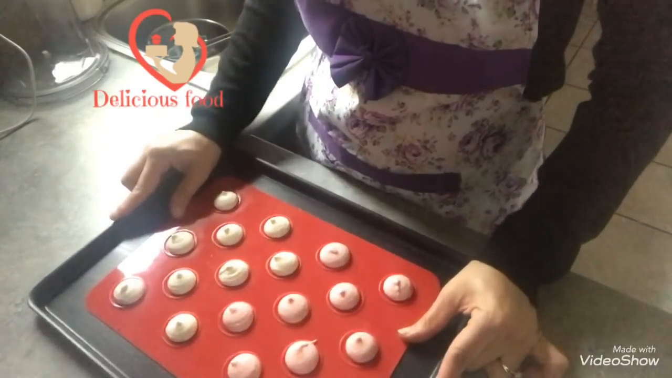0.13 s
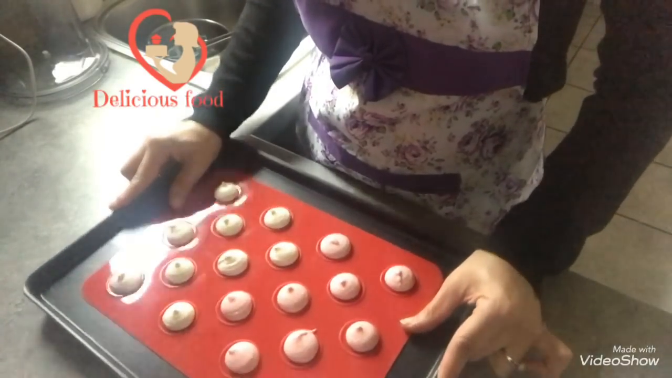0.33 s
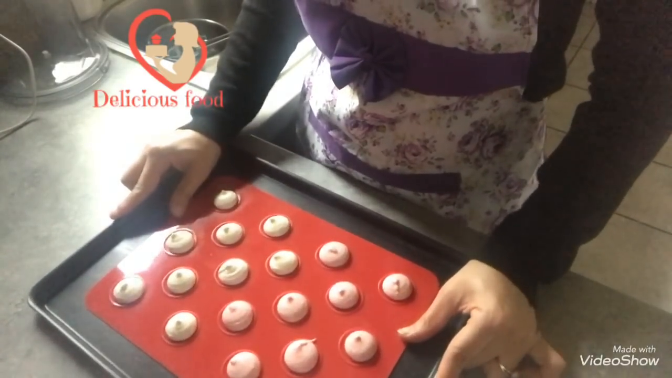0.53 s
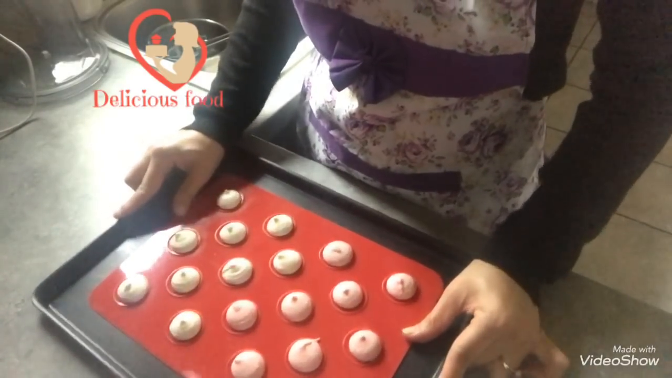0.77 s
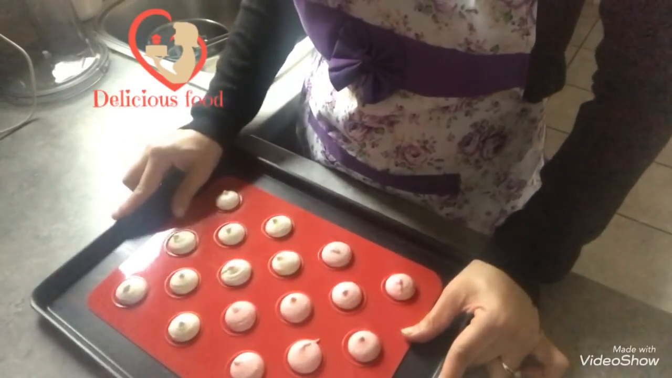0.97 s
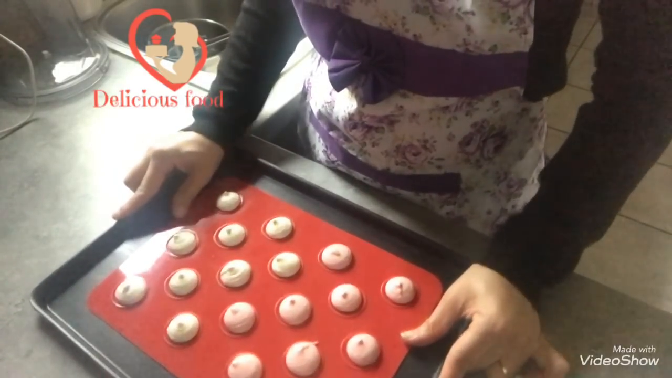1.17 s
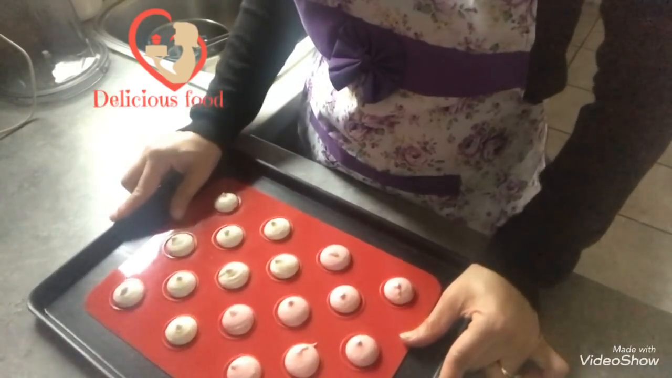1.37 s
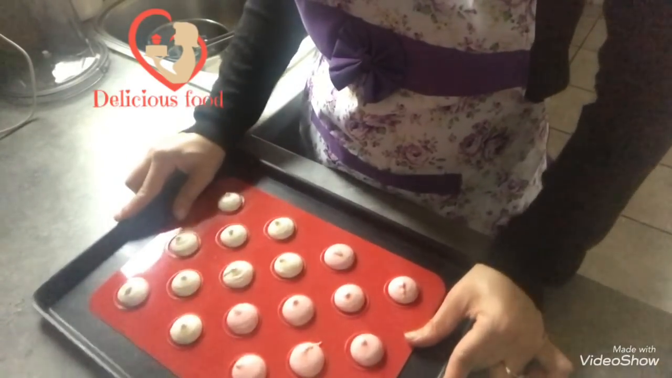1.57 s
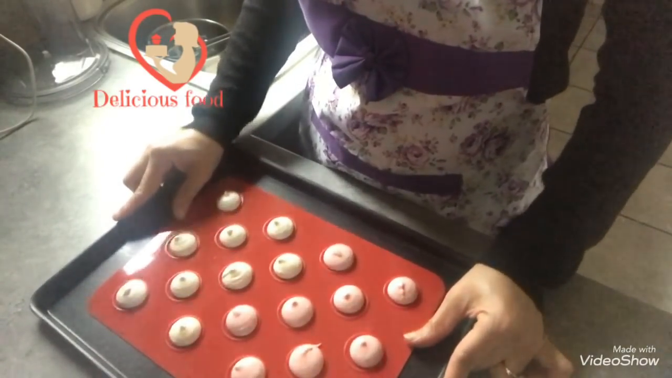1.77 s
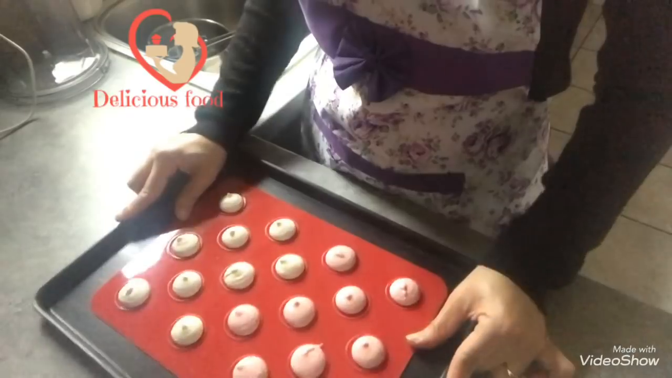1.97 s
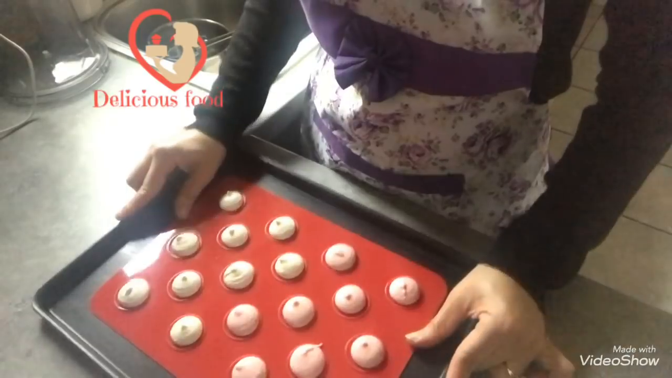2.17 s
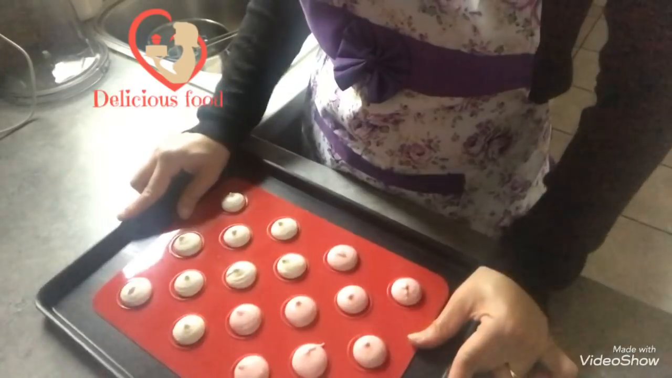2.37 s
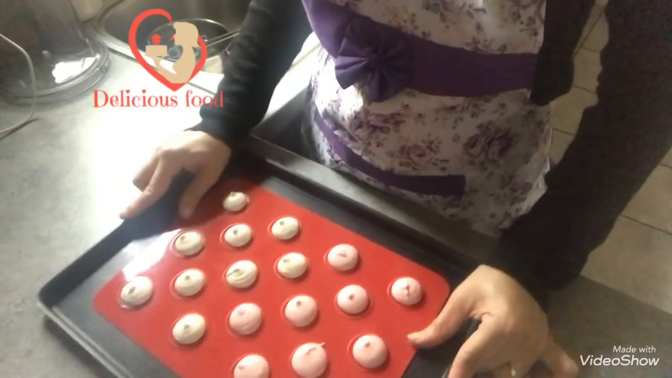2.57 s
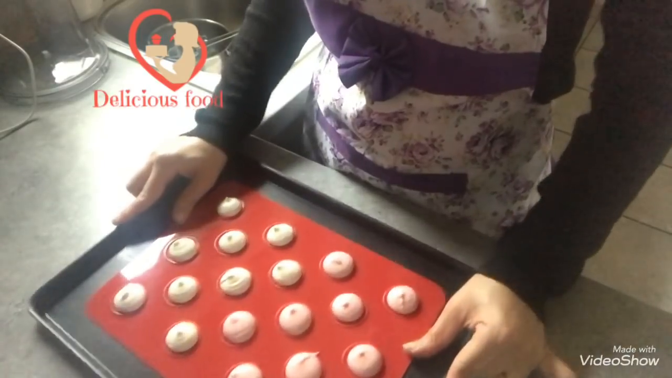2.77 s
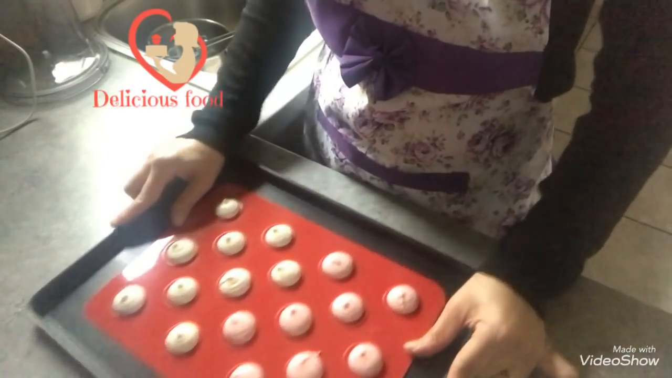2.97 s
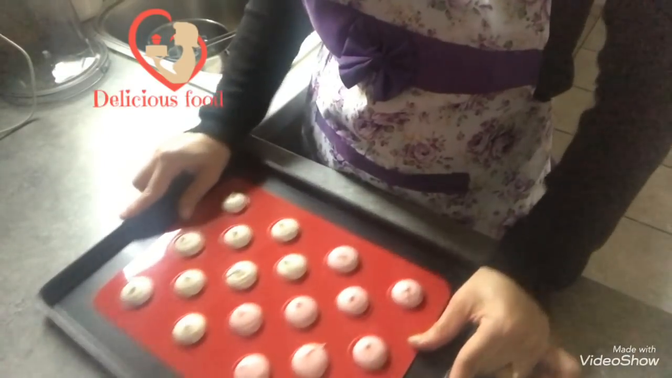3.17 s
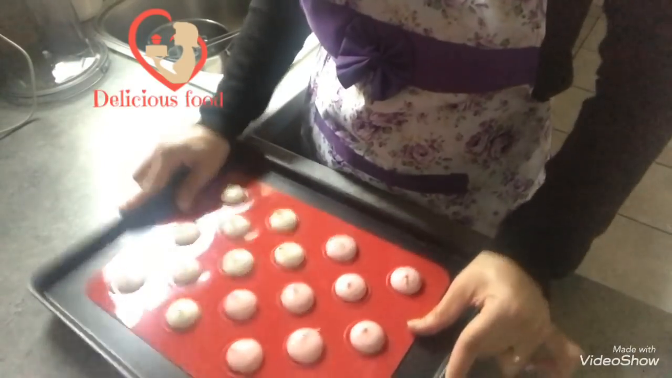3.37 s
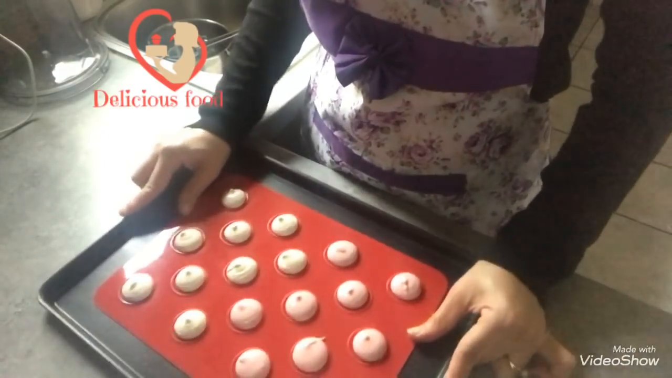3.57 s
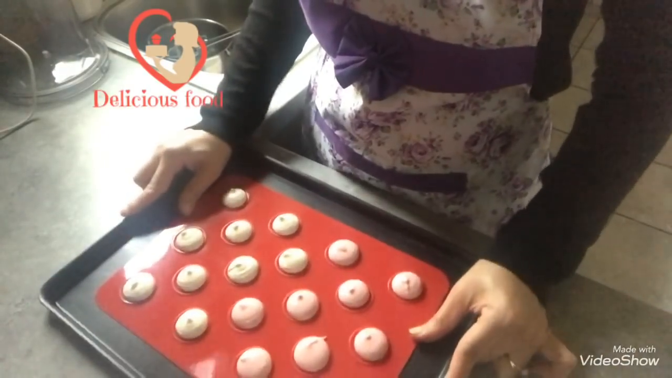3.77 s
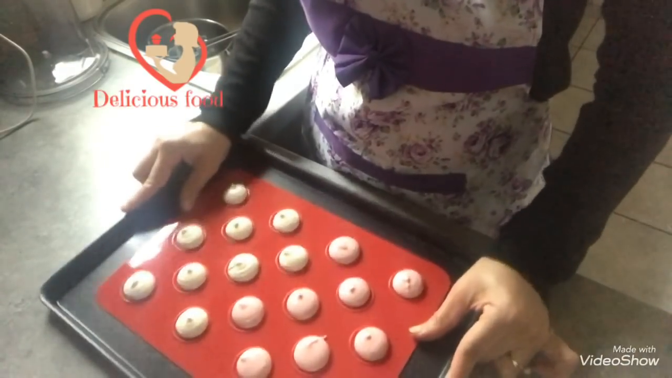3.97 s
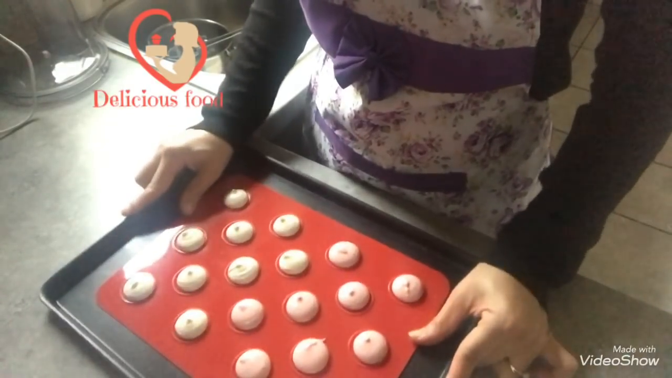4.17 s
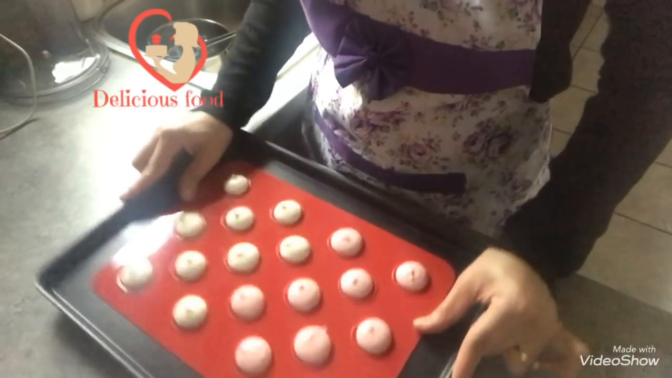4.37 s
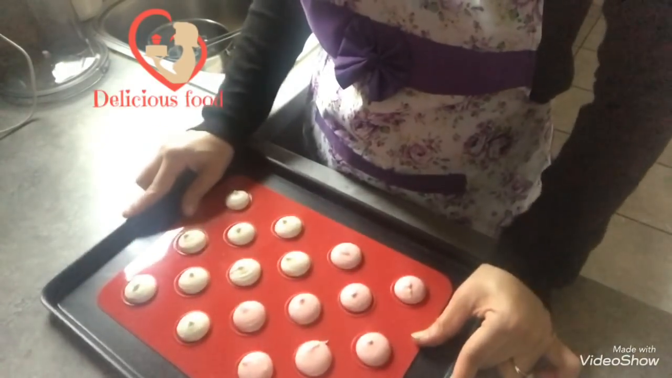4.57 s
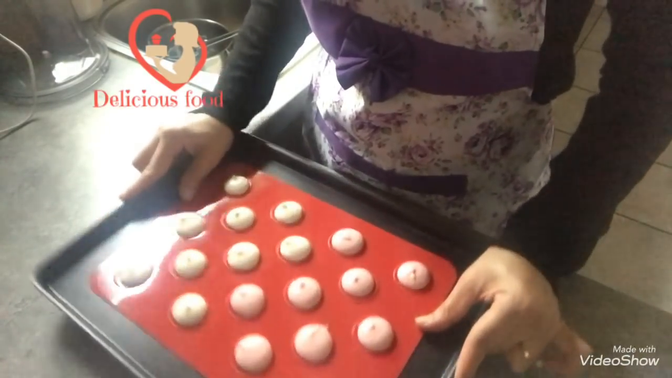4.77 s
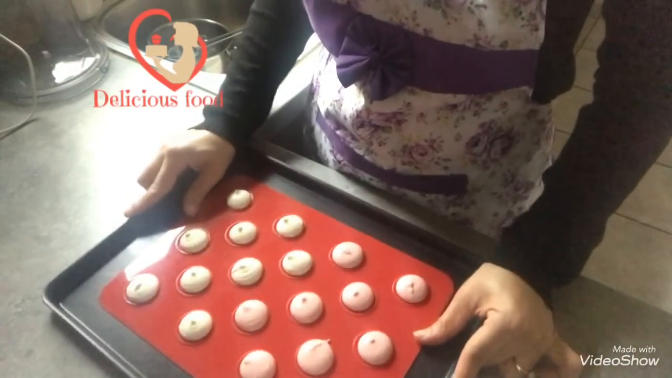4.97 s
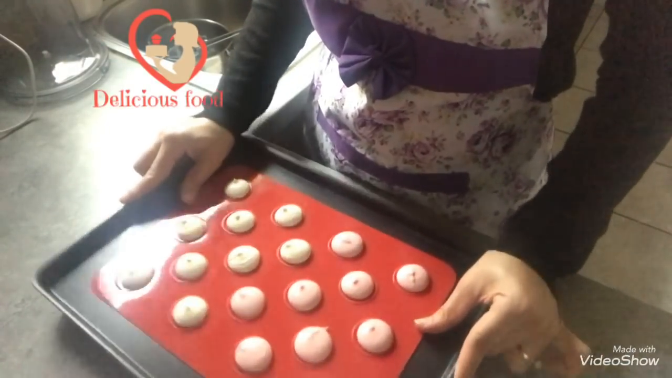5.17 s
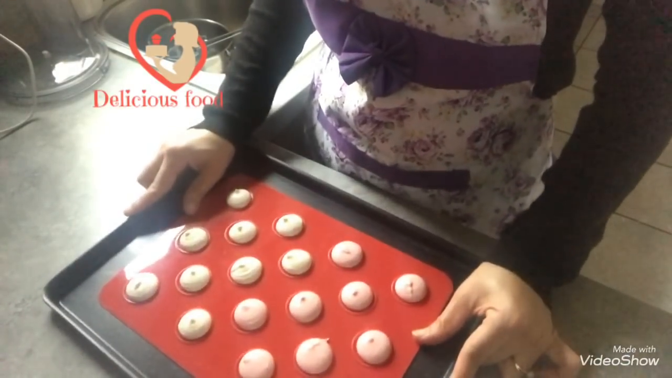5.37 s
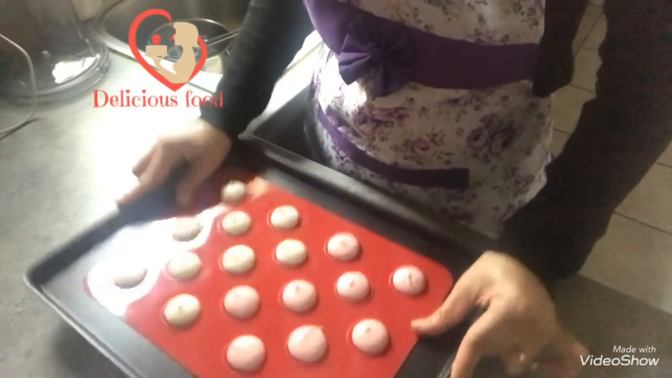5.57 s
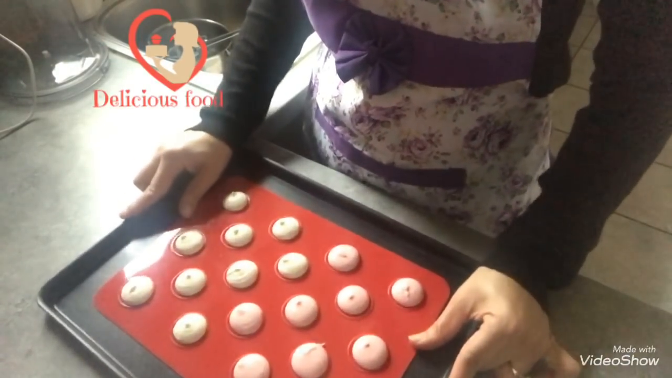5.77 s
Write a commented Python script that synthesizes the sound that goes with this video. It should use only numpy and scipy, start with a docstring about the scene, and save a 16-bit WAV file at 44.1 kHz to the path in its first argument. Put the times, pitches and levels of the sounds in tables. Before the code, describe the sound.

Loud, clattering knocks of a baking tray on a stone counter, two runs of seven split by a short pause with faint rubbing.

```python
"""A loaded metal baking tray is rapped on a stone worktop: seven blows, a pause, seven more.
Each blow is an edge knock, a corner crack and a flat slap; they ring damped modes and shape noise.
In the pause the tray is shaken to and fro on the worktop: rubbing noise follows the speed of each stroke.
The place is a hard-walled kitchen with rooms beyond; echo paths run about 1.6 to 7.5 m past the direct one.
One microphone channel, with house quiet and hiss underneath; the recorder limits the peaks."""
import sys
import numpy as np
from scipy import signal
from scipy.io import wavfile
from scipy.ndimage import uniform_filter1d

SR = 44100
rng = np.random.default_rng(int(sys.argv[2]) if len(sys.argv) > 2 else 0)


def bounce(signal):
    """Save signal as a 16-bit WAV file at the path given by the first command-line argument."""
    frames = np.transpose(np.atleast_2d(signal))
    limited = np.clip(frames, -1, 1)
    pcm = np.round(limited * 32767).astype(np.int16)
    wavfile.write(sys.argv[1], SR, pcm)


N = 256573  # length in samples
EDGES_HZ = 30 * 2 ** np.arange(0, 9.3, 0.4)  # edges of the noise bands


def from_db(db):
    """Amplitude ratio of a level in dB."""
    return 10 ** (np.asarray(db) / 20)


def energy_from_db(db):
    """Energy ratio of a level in dB."""
    return from_db(2 * np.asarray(db))


def rms_one(x):
    """The signal scaled to rms 1."""
    return x / np.sqrt(np.mean(x ** 2) + 1e-20)


def at_hz(points, hz, column=1):
    """One column of a table read at a frequency, straight lines over log frequency."""
    points = np.array(points)
    return np.interp(np.log(hz), np.log(points[:, 0]), points[:, column])


def filtered(x, order, hz, kind="low"):
    """Butterworth filter."""
    return signal.sosfilt(signal.butter(order, hz, kind, fs=SR, output="sos"), x)


def clicks(times, sizes):
    """One sample of the given size at each time in seconds."""
    out = np.full(N, 1e-18)
    np.add.at(out, (np.asarray(times) * SR).astype(int), sizes)
    return out


def ring(x, hz, t60):
    """Damped resonance: a unit click sets a sine of height 1 ringing, 60 dB down after t60 seconds."""
    r = from_db(-60 / (t60 * SR))
    w = 2 * np.pi * hz / SR
    return signal.lfilter([0, np.sin(w)], [1, -2 * r * np.cos(w), r * r], x)


def noise_bands():
    """Yields centre Hz and noise of each band; neighbours use unrelated noise."""
    white = rng.standard_normal((2, N))
    for k, (low, high) in enumerate(zip(EDGES_HZ, EDGES_HZ[1:])):
        yield np.sqrt(low * high), filtered(white[k % 2], 2, [low, high], "band")


def coloured(spectrum):
    """Steady noise of the given colour, rms 1."""
    return rms_one(sum(from_db(at_hz(spectrum, hz)) * band for hz, band in noise_bands()))


def spread(energy, seconds):
    """Energy smeared over a short time by a one-pole average."""
    r = np.exp(-1 / (seconds * SR))
    return signal.lfilter([1 - r], [1, -r], energy)


def dying(energy, t60):
    """Energy that dies away; it falls at twice the dB rate of amplitude."""
    return signal.lfilter([1], [1, -from_db(-120 / (t60 * SR))], energy)


# Hardness in dB tilts the treble and weight in dB tilts the bass of an onset; strike_db scales both by pitch.
EDGE_WEIGHT_DB, SLAP_HARDNESS_DB = -19, -5.5
CORNER, TOUCH, EARLY_CLICK = (4.64, -4.5), (-9.5, -0.58), (0.32, -1.5)  # (hardness dB, weight dB)
# a faint click is heard 23 ms before each crack; nothing strikes then (level in dB over that crack)
EARLY_CLICK_LEAD_S, EARLY_CLICK_DB = 0.0232, -26.5
# Blows of the tray on the stone. Each row: edge landing in seconds, edge level in dB, edge hardness in dB,
# corner delay after the edge in seconds, corner level in dB, slap delay after the edge in seconds,
# slap level in dB, slap weight in dB.
BLOWS = [(0.0229, -5, -1.5, 0.0038, -9.5, 0.012, -16.5, 9.5),
         (0.4804, -11.5, -3, 0.00022, -15.5, 0.0059, -26, 15.5),
         (0.8461, -5, -30, .0076, -8, 0.022, -11.5, 4), (1.2531, -4.5, -33, 0.0029, -7.5, .016, -17, 6),
         (1.6370, -8.5, -11, 0.012, -7.5, 0.027, -10, 1), (2.029, -6, -5.5, .011, -7.5, 0.018, -11.5, 3.5),
         (2.4224, -7, -12, 0.0037, -6.5, .0173, -10.5, -0.5),
         (3.4914, -5.5, -41, 0.0044, -7, 0.018, -9.5, -0.5), (3.858, -10, -7, 0.00083, -12, 0.0043, -17, 7),
         (4.2068, -5, -11, .0069, -7, 0.012, -10.5, 2.5),
         (4.583, -8, 2, 0.00013, -13.5, 0.0032, -12.5, 5.5), (4.9622, -10, -6, .0004, -9, .007, -10.5, 3),
         (5.3407, -11.5, 0.5, 0.0016, -11.5, 0.0083, -16, 10.5),
         (5.7151, -9, -6, 0.00028, -7.5, .0075, -7.5, -2.5)]
# Light touches of the tray while it is lifted or shifted. Each row: time in seconds, level in dB.
TOUCHES = [(1.105, -40), (1.53, -44), (1.887, -35.5), (2.252, -49), (3.31, -44), (3.328, -27.5),
           (4.062, -50.5), (4.409, -39), (4.798, -41.5), (5.182, -37.5), (5.542, -35.5)]


def all_onsets():
    """Blows break into edge, corner and slap; touches and early clicks join as rows of the same columns."""
    rows = [(s, db, *TOUCH) for s, db in TOUCHES]
    for edge_s, edge_db, hardness_db, corner_delay, corner_db, slap_delay, slap_db, weight_db in BLOWS:
        corner_s = edge_s + corner_delay
        rows.append((edge_s, edge_db, hardness_db, EDGE_WEIGHT_DB))
        rows.append((corner_s, corner_db, *CORNER))
        rows.append((edge_s + slap_delay, slap_db, SLAP_HARDNESS_DB, weight_db))
        rows.append((corner_s - EARLY_CLICK_LEAD_S, corner_db + EARLY_CLICK_DB, *EARLY_CLICK))
    return np.transpose(rows)  # time, strength, hardness, weight


def strike_db(hz):
    """Strength of each onset at one pitch: hardness counts in the treble, weight in the bass."""
    _, strength_db, hardness_db, weight_db = all_onsets()
    treble = np.clip(np.log2(hz / 2500) / 0.8, 0, 1.6)
    bass = np.clip(np.log2(800 / hz) / 0.3, 0, 1)
    return strength_db + treble * hardness_db + bass * weight_db


CONTACT_HZ = 7300  # the finite contact time blunts the blow on the modes
# Damped modes of tray and worktop. Each row: frequency in Hz, level in dB, t60 in seconds.
MODES = [(57.5, -17, 0.14), (118.3, -26.5, 0.26), (168.9, -23, 0.26), (212, -35.5, 0.3),
         (258.2, -24.5, 0.31), (324.8, -15, 0.073), (363, -15, 0.13), (700, -65, .1), (750, -31.5, 0.3),
         (1017, -23.5, 0.15), (1320, -30, 0.033), (1383, -20, 0.096), (1555, -19.5, 0.099),
         (1700, -22, 0.0099), (1811, -11.5, 0.076), (1950, -43.5, 0.021), (2173, -29, 0.09),
         (2305, -30.5, 0.38), (2422, -18, 0.066), (2570, -30, 0.036), (3010, -19, 0.011),
         (3486, -11, 0.021), (4220, -19, 0.095), (875, -27.5, 0.099), (2620, -39.5, 0.029),
         (3180, -28, 0.063), (3916, -22, 0.065), (5100, -22, 0.037), (5880, -19, 0.049), (6280, -24, 0.075)]


def ringing_modes():
    """Every onset sets all modes ringing; where a contact lands on the mode shapes varies the amounts."""
    times = all_onsets()[0]
    spot = rng.normal(0, 1, (len(times), len(MODES)))  # place on the mode shapes
    out = np.zeros(N)
    for k, (hz, level_db, t60) in enumerate(MODES):
        push = from_db(strike_db(hz) + level_db) * (1 + 0.7 * spot[:, k])
        out += ring(clicks(times, push), hz, t60)
    return filtered(out, 3, CONTACT_HZ)


def crack():
    """The instant of each onset: a bare click without its bass, stronger for hard ones."""
    click = clicks(all_onsets()[0], from_db(strike_db(16000) - 4.5))
    return filtered(click, 2, 4000, "high")


RATTLE_HZ, RATTLE_DB = 300, 2.5  # top rate and rms depth of the chatter


def rattle():
    """The sheet chatters on the stone: fast random swings of energy, mean 1."""
    swing = filtered(rng.standard_normal(N), 2, RATTLE_HZ)
    energy = energy_from_db(RATTLE_DB * rms_one(swing))
    return energy / energy.mean()


# Short burst at contact. Each row: frequency in Hz, level in dB over the shudder.
KNOCK = [(300, -3), (1500, 5.5), (4000, 1.5), (12000, -1.5)]
KNOCK_T60_S = 0.048


def knock(blow, hz):
    """Energy of the short burst at contact in one band."""
    return energy_from_db(at_hz(KNOCK, hz)) * dying(blow, KNOCK_T60_S)


BUILD_UP_S = 0.0055
# Reverberation of the place. Each row: frequency in Hz, kitchen level in dB over the shudder, kitchen t60
# in seconds, level of the rooms beyond in dB over the shudder, their t60 in seconds.
ROOM = [(50, 1.5, 0.16, -25, 0.59), (150, -2, 0.1, -20, 1.0), (352, -0.5, 0.2, -26.5, 0.47),
        (600, -2.5, 0.21, -26.5, 1), (1170, -6, 0.32, -26.5, 1), (2500, -5.5, 0.3, -26, 0.93),
        (6920, -1, 0.26, -23, 0.77), (9900, -7.5, 0.24, -31, 0.16), (15000, 0, 0.22, -31.5, 0.54)]


def reverberation(blow, hz):
    """Diffuse energy in one band: it builds up, then dies in two slopes."""
    near_db, near_t60, far_db, far_t60 = (at_hz(ROOM, hz, column) for column in range(1, 5))
    late = spread(blow, BUILD_UP_S)
    kitchen = energy_from_db(near_db) * dying(late, near_t60)
    rooms_beyond = energy_from_db(far_db) * dying(late, far_t60)
    return kitchen + rooms_beyond


SHUDDER_DB = 1  # added to the whole colour
RISE_CYCLES = 0.7  # low bands need a cycle or so to swing up
# Colour of the sheet's shudder, too dense for single modes. Each row: frequency in Hz, level in dB per Hz.
SHUDDER = [(18, -42), (30, -13), (323, 0), (593, -6), (1660, 0), (1800, 3.5), (2000, -5.5), (2340, 0.5),
           (4070, -6.5), (6050, -15), (10300, -26.5), (12700, -22.5), (15200, -38.5), (16500, -40.5)]
# Decay of the shudder. Each row: frequency in Hz, t60 in seconds.
SHUDDER_T60 = [(40, 0.25), (300, 0.18), (2000, 0.11), (6000, 0.076), (15000, 0.016)]


def shudder_and_room():
    """Noise bands that follow the energy of shudder, knock and reverberation after each onset."""
    times = all_onsets()[0]
    chatter = rattle()
    colour_db = 0.75 * rng.standard_normal((len(times), len(EDGES_HZ)))  # no two onsets share a colour
    out = np.zeros(N)
    for k, (hz, band) in enumerate(noise_bands()):
        impact = clicks(times, energy_from_db(strike_db(hz) + colour_db[:, k]))
        blow = spread(impact, RISE_CYCLES / hz)
        shudder = chatter * dying(blow, at_hz(SHUDDER_T60, hz))
        energy = shudder + knock(blow, hz) + reverberation(blow, hz)
        out += from_db(at_hz(SHUDDER, hz) + SHUDDER_DB) * band * np.sqrt(energy)
    return out


# First echoes off ceiling and walls. Each row: delay behind the direct sound in seconds, level in dB.
ECHOES = [(.0047, -29.5), (.0095, -11), (0.0141, -13.5), (.022, -13)]


def echoes(x):
    """The direct sound and its first few reflections, each a delayed weaker copy."""
    out = x.copy()
    for delay_s, echo_db in ECHOES:
        lag = int(delay_s * SR)
        out[lag:] += from_db(echo_db) * x[:N - lag]
    return out


def tray():
    """Modes and crack with their first echoes, over the noise of shudder and room."""
    return echoes(ringing_modes() + crack()) + shudder_and_room()


STROKES_END_S = 3.335
RUB_POWER = 1.2  # rubbing grows as this power of the speed
# Strokes of the tray to and fro. Each row: start in seconds, rubbing level in dB at full speed,
# level in dB of the bump at the turn that starts it.
STROKES = [(2.775, -64.5, -85), (2.886, -57.5, -79), (2.995, -54.5, -47.5), (3.109, -55, -54),
           (3.23, -55.5, -69)]
# Colour of the rubbing. Each row: frequency in Hz, relative level in dB per Hz.
SLIDE_COLOUR = [(120, -21), (330, -4.5), (700, -9.5), (1600, -7), (4000, -10.5), (10000, -27), (13000, -31),
                (16500, -23)]


def sliding():
    """Rubbing hiss that follows the speed of each stroke, and a soft two-mode bump at each turn."""
    starts, rub_db, bump_db = np.transpose(STROKES)
    turns = np.append(starts, STROKES_END_S)
    count = np.interp(np.arange(N) / SR, turns, np.arange(len(turns)))  # strokes made so far
    speed = np.abs(np.sin(np.pi * count))  # zero at each turn
    stroke = np.minimum(count.astype(int), len(starts) - 1)
    rubbing = from_db(rub_db[stroke]) * speed ** RUB_POWER * coloured(SLIDE_COLOUR)
    bump = clicks(starts, from_db(bump_db))
    return rubbing + ring(bump, 140, 0.053) + ring(bump, 59, 0.1)


AIR_DB = -66  # rms level
# Quiet of the house and microphone hiss. Each row: frequency in Hz, relative level in dB per Hz.
AIR = [(25, -4.5), (60, 9.5), (240, -0.5), (350, 10.5), (520, -10), (1500, -4), (3400, -15.5), (8000, -18),
       (10500, -25.5), (13000, -17.5), (16000, -37)]


def air():
    """Steady coloured noise under everything."""
    return from_db(AIR_DB) * coloured(AIR)


def scene():
    """Tray blows, sliding with its first echoes, and the quiet background, in one channel."""
    return (tray() + echoes(sliding()) + air())[None]


BASS_CUT_HZ, CUTOFF_HZ = 49, 16800
LIMIT_DB, RELEASE_DB_PER_S = -5, 316
TOP = 0.6  # ceiling of the rounded peaks, full scale 1


def record(dry):
    """Bass roll-off, a fast limiter that looks a little ahead, rounded peaks, the top cut off."""
    dry = filtered(dry, 4, BASS_CUT_HZ, "high")
    fall_db = RELEASE_DB_PER_S * np.arange(N) / SR
    over_db = np.maximum(20 * np.log10(np.abs(dry) + 1e-9) - LIMIT_DB, 0)
    # a running maximum that falls at the release rate
    held_db = np.maximum.accumulate(over_db + fall_db, axis=1) - fall_db
    # mean over the coming millisecond, so the gain dips before the peak
    ahead_db = uniform_filter1d(np.roll(held_db, -22, axis=1), size=45, axis=1)
    limited = TOP * np.tanh(dry * from_db(-ahead_db) / TOP)
    return signal.sosfilt(signal.cheby2(12, 70, CUTOFF_HZ, fs=SR, output="sos"), limited)


dry = scene()
out = record(dry)
bounce(out)
```